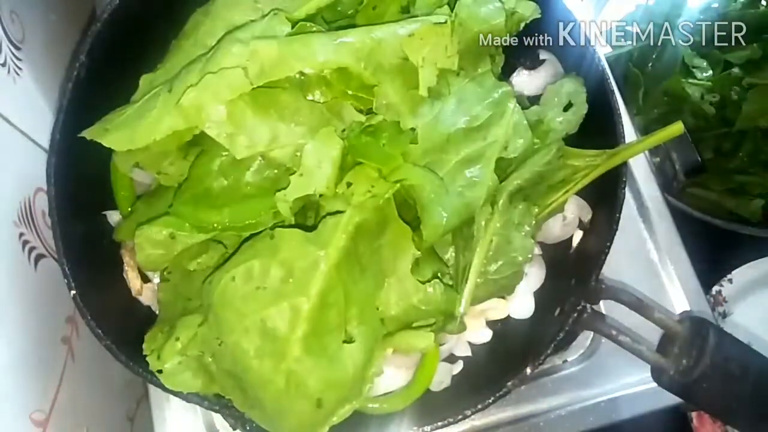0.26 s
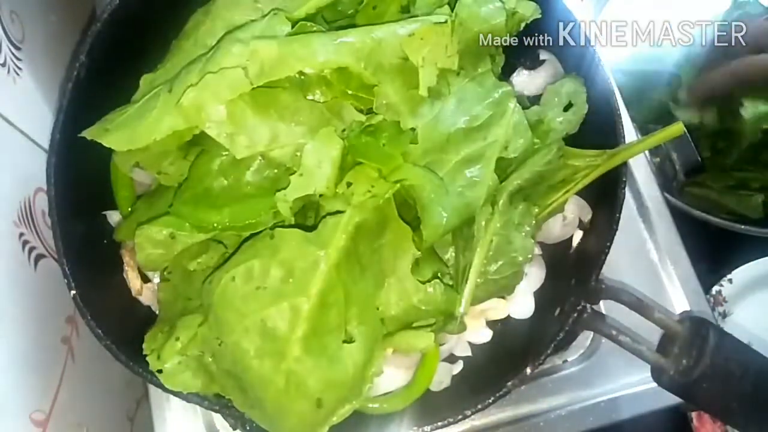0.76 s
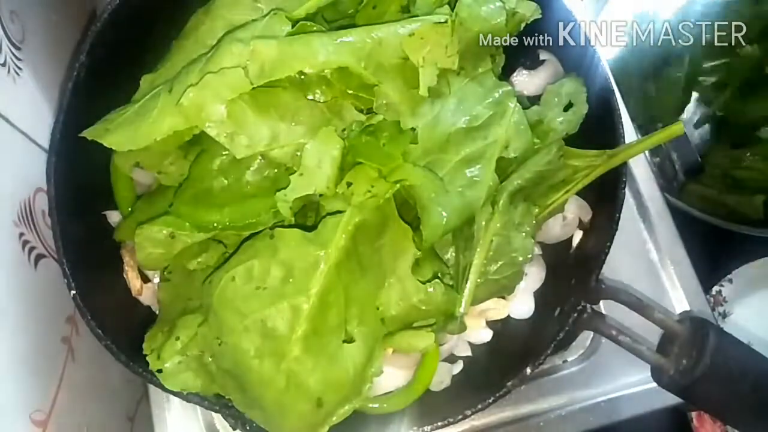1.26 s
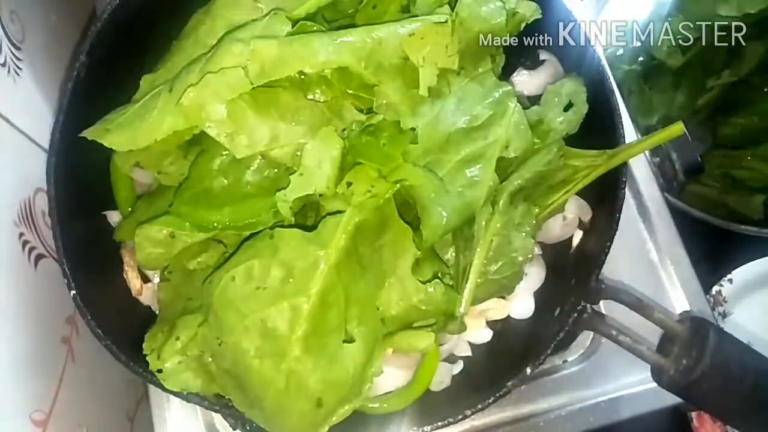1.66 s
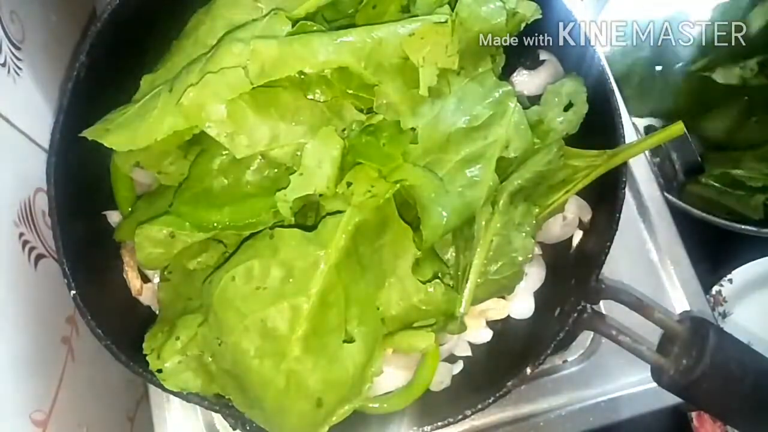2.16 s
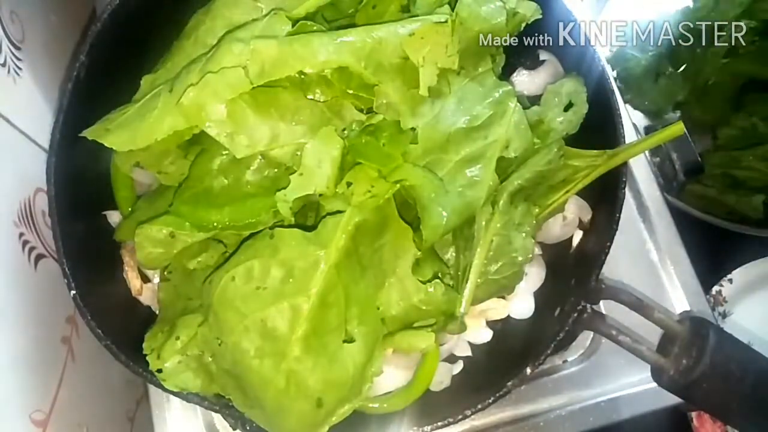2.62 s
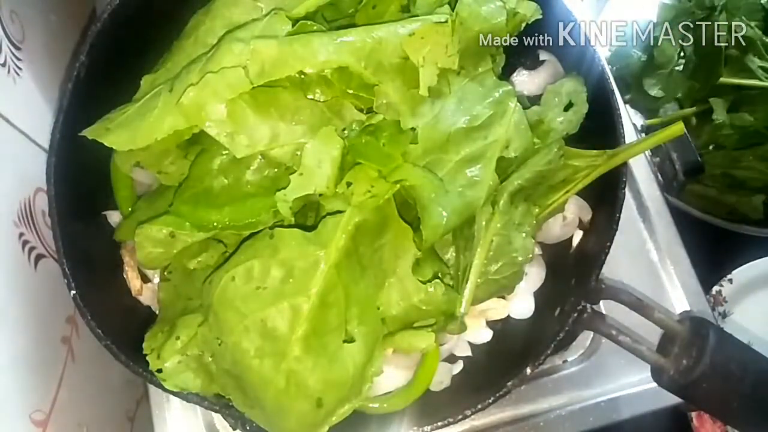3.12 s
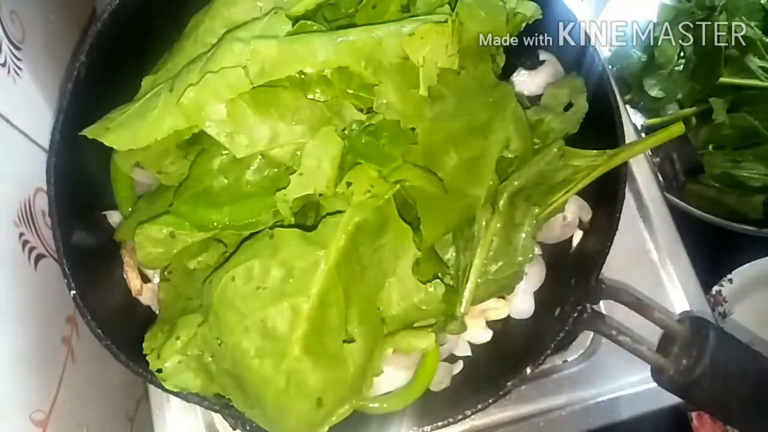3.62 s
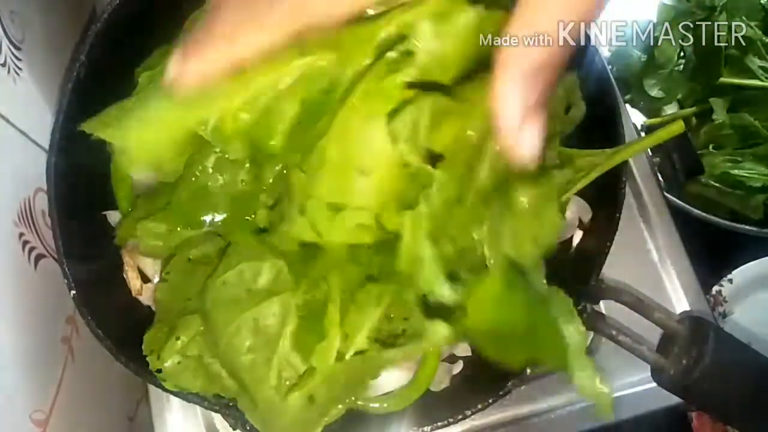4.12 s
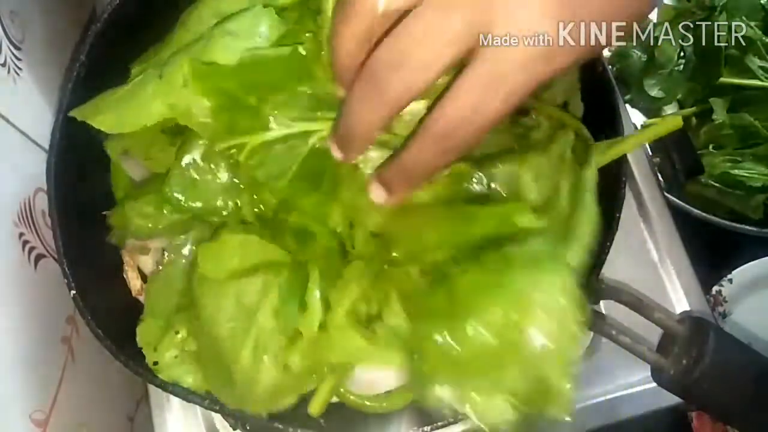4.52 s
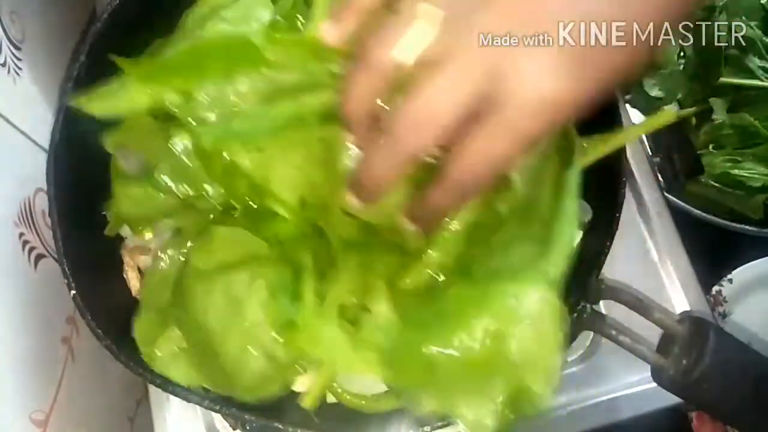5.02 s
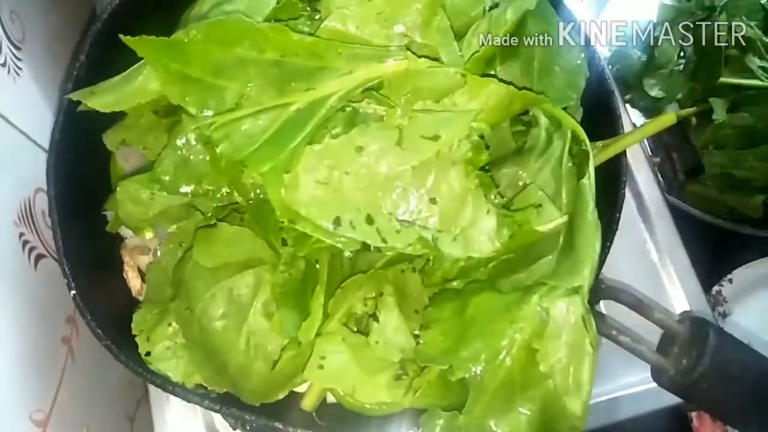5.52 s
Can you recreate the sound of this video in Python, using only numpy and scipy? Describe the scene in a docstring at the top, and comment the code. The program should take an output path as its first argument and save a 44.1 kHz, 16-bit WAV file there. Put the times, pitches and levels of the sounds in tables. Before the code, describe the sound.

Close phone recording in a small kitchen: wet leaves fry in a pan with steady fine fizz, loose crackle and ringing pops. Bright spitting flares in the first second, then thins. Dull bumps follow midway, a bunch of wet leaves slaps down just after four seconds, and pops crowd back near the end over a throbbing low hum.

```python
"""Wet leaves fry in oil in a pan close to a phone microphone, in a small kitchen where a fan motor hums and throbs.
Steam bubbles burst throughout: a dense fizz, a looser crackle, and single pops that ring the pan, with oil spatter.
The finest spitting flares from 0.4 to 1 s; bumps come at 2.5 s and, strongest, at 3.3 s; at 4.1 s wet leaves
slap down, and pops crowd in again after 5 s. Bursts are filtered clicks and noise; the phone thins weak sound."""
import sys
import numpy as np
from scipy import signal
from scipy.fft import rfft, irfft
from scipy.io import wavfile
from scipy.ndimage import uniform_filter1d

SR = 44100
rng = np.random.default_rng(int(sys.argv[2]) if len(sys.argv) > 2 else 0)


def int16_out(signal):
    """Quantize to a 16-bit WAV file."""
    q = np.round(np.clip(np.atleast_2d(signal).T, -1, 1) * 32767)
    wavfile.write(sys.argv[1], SR, q.astype(np.int16))


N = 254765

# ringing modes of the pan: (pitch [Hz], width [Hz], relative level [dB])
PAN = [(570, 71, 0), (792, 26, -6.5), (929, 69, 3.5), (1130, 67, 3), (1279, 68, 3.5), (1674, 115, 2.5),
       (1838, 92, -5.5), (1945, 60, 0), (2251, 71, 2), (2400, 49, -9), (2747, 55, 0), (3036, 107, 0)]
TOP_HZ = 15800  # upper limit of the phone and of the treble in the room tail


def undb(db):
    """Gain of a level in dB."""
    return 10 ** (np.asarray(db) / 20)


def level(x, db):
    """Scale to an rms level in dB."""
    return x * undb(db) / np.sqrt(np.mean(x ** 2))


def band(x, lo_hz, hi_hz, order=2):
    """Causal band-pass."""
    return signal.sosfilt(signal.butter(order, [lo_hz, hi_hz], "bandpass", fs=SR, output="sos"), x)


def mode(x, hz, width_hz, order=1):
    """One resonance: a band-pass centred on its pitch."""
    return band(x, hz - width_hz / 2, hz + width_hz / 2, order)


def walk(rate):
    """Random levels held 1 / rate s and smoothed twice; their spread is about 0.7."""
    k = int(SR / rate)
    held = np.repeat(rng.standard_normal(N // k + 1), k)
    return uniform_filter1d(uniform_filter1d(held, k), k)[:N]


def bursts(per_s, spread_db, most=4.47):
    """Clicks of either sign at random moments; most are small, a few are large."""
    hit, size, sign = rng.random((3, N))
    size_db = spread_db * np.minimum(-np.log(size + 1e-9), most)
    return (hit < per_s / SR) * undb(size_db) * np.sign(sign - .5)


def curves(table):
    """Gains over time from the dB columns of a table."""
    s, *columns = np.transpose(table)
    return [undb(np.interp(np.arange(N) / SR, s, c)) for c in columns]


def along(table, f):
    """Read a (frequency [Hz], level [dB]) table on a log-frequency axis."""
    hz, db = np.transpose(table)
    return np.interp(np.log(np.maximum(f, 1)), np.log(hz), db)


def frying():
    """Tiny bubbles fizz near 4.5 kHz, larger ones crackle in the pan, the finest spit in the top octave."""
    # rms level of the fizz; its lower edge, 3.5 to 3.9 kHz, is set as the phone lets it through:
    # (time [s], main band [dB], lower edge [dB])
    fizz_levels = [(0, -49.5, -56.5), (.4, -51, -56), (.72, -49.5, -50.5), (1.21, -50, -57),
                   (2.14, -50, -54.5), (3.06, -52, -53), (3.39, -51, -64), (3.68, -51, -57.5),
                   (4.15, -51.5, -63), (4.38, -53.5, -87), (4.65, -52, -62), (4.79, -51, -57.5),
                   (5.39, -51, -56.5), (5.78, -50.5, -56)]
    # how lively the leaves crackle: (time [s], bright ticks [dB], dull ticks [dB])
    crackle_levels = [(0, -58.5, -66), (.32, -59, -66.5), (.53, -54, -59), (.66, -59, -64), (.98, -56, -65),
                      (1.2, -60, -67.5), (1.7, -63, -70.5), (2.01, -63, -77), (2.23, -61, -60),
                      (2.57, -60.5, -66.5), (2.81, -63, -64.5), (2.95, -56.5, -57.5), (3.15, -66, -72),
                      (3.4, -61.5, -66), (3.81, -67.5, -67), (4.38, -70, -70.5), (4.76, -60, -61.5),
                      (4.99, -64, -62.5), (5.37, -59, -69), (5.47, -74, -60), (5.62, -55.5, -63),
                      (5.78, -55, -69)]
    main, edge = curves(fizz_levels)
    bright, dull = curves(crackle_levels)

    fizz = band(bursts(3200, 3.5, most=6.4), 3830, 5280, order=5)
    fizz = fizz + .6 * band(fizz, 4160, 4630, order=1)
    fizz = level(fizz, 0) * undb(1.27 * walk(9))
    lower_edge = level(band(bursts(1200, 4.9), 3500, 3860, order=3), 0)

    # the finest spitting idles, and flares while water runs into the oil
    start_s, rise_s, hold_s, fall_s = .416, .066, .41, .12
    corners_s = np.cumsum([start_s, rise_s, hold_s, fall_s])
    flare = np.interp(np.arange(N) / SR, corners_s, [0, 1, 1, 0])
    idle_db, flare_db = -80.5, 10.5
    spit = level(band(bursts(900, 5.7), 12300, 12800), idle_db)
    spit = spit * undb(flare_db * flare + 3.8 * walk(8))

    dull_ticks = crackle(PAN[1:5], wider=2.6) * dull
    bright_ticks = crackle(PAN[5:]) * bright
    return fizz * main + lower_edge * edge + dull_ticks + bright_ticks + spit


def crackle(modes, wider=2.8):
    """Soft grains of larger bubbles wake the rings of the pan, each ring in short patches of its own."""
    shared, out = bursts(150, 4.0), np.zeros(N)
    for hz, width_hz, db in modes:
        patches = undb(4.5 * walk(22))
        grains = .6 * shared + bursts(160, 4.2)
        out += level(mode(grains, hz, wider * width_hz, order=2), db) * patches
    return level(out, 0)


def pops():
    """Each pop is a very short rough burst that rings on its own pitch, a thud below it and a tick above."""
    # the louder pops, peak levels of each part's main burst:
    # (time [s], bubble pitch [Hz], bubble [dB], thud in the pan [dB], sharp tick [dB])
    pop_rows = [(.0197, 2870, -42, -62, -33), (.0814, 3190, -54, -60, -36), (.0879, 3190, -49, -63, -33),
                (0.1121, 2070, -35.5, -71.5, -51), (0.1377, 2440, -43, -66.5, -31),
                (.1652, 1954, -55, -63, -37), (.1927, 1940, -60, -66, -36), (0.202, 2260, -28, -40, -27),
                (0.251, 2140, -22.5, -25.5, -45.5), (.2697, 2000, -38, -51, -29),
                (0.3187, 2300, -35.5, -34, -23.5), (.3535, 3030, -50, -58.5, -26.5),
                (.4094, 2480, -60, -66.5, -31), (0.4732, 2090, -26, -47, -30), (.4911, 2800, -32, -40, -44),
                (.524, 2310, -32.5, -71, -32), (.5402, 1940, -38, -39, -29),
                (0.5485, 2700, -34, -59.5, -29), (.5531, 2900, -33.5, -42, -25.5),
                (.5653, 1900, -38, -59, -39), (.587, 2580, -21, -41, -28.5), (.6074, 2470, -32, -58, -30),
                (.6347, 2340, -31, -61, -43), (.6547, 2750, -46, -69.5, -26), (.6624, 3100, -47, -60, -29),
                (0.6793, 2450, -26.5, -68.5, -31), (.6918, 2460, -28, -51, -46),
                (.6975, 1920, -41, -58, -28), (.7172, 2390, -42, -54, -46), (0.741, 2630, -28, -46, -19),
                (.7884, 3070, -34, -74, -22), (0.8137, 2590, -29, -69.5, -34), (.8384, 2930, -35, -56, -39),
                (.8469, 2820, -35.5, -64, -29), (.8755, 2350, -31, -76, -34), (.9481, 2350, -42, -62, -36),
                (.985, 2400, -37.5, -62, -43), (1.019, 2230, -34.5, -66, -32),
                (1.049, 1980, -41, -42, -28.5), (1.067, 2580, -33, -74, -32),
                (1.1636, 2330, -56.5, -59, -27), (1.346, 1890, -54, -62, -41),
                (1.3628, 3320, -59, -50, -31), (1.4184, 2240, -30.5, -52, -21.5),
                (1.6036, 1680, -51, -67, -36), (1.6479, 3200, -57, -68, -35),
                (1.6766, 2980, -47, -70, -30.5), (1.7003, 2230, -37, -66, -27.5),
                (1.7557, 1700, -49, -64, -33.5), (1.8024, 2240, -45.5, -65.5, -26.5),
                (1.9208, 2380, -37, -48, -26), (1.9302, 2170, -33.5, -47.5, -24.5),
                (2.0533, 2250, -24, -30, -21.5), (2.0917, 2300, -30, -40.5, -24.5),
                (2.1917, 2140, -38, -72.5, -33.5), (2.2369, 1870, -49, -58, -32.5),
                (2.3041, 1700, -65, -66, -44), (2.3257, 3200, -56, -63, -30), (2.3562, 3180, -57, -54, -40),
                (2.4927, 2380, -21, -33, -23), (2.5262, 3080, -23, -40, -21.5),
                (2.5474, 2320, -28.5, -53.5, -26), (2.5698, 3170, -40, -50, -31),
                (2.6594, 1790, -40.5, -65.5, -32.5), (2.6953, 2130, -42, -70.5, -30.5),
                (2.7049, 3180, -48, -68, -41), (2.7929, 2480, -27.5, -45, -31),
                (2.849, 1870, -32, -62, -31), (2.8574, 1890, -38, -50, -31.5),
                (2.9348, 2250, -23.5, -45, -45), (2.95, 1930, -31.5, -42.5, -26),
                (3.031, 2150, -39, -42, -28), (3.1052, 2410, -41, -71, -28),
                (3.127, 2760, -28.5, -45, -25.5), (3.1896, 2340, -29, -61, -28.5),
                (3.3256, 2150, -24.5, -36, -28), (3.407, 1720, -36, -41, -28.5),
                (3.4546, 3030, -36, -61, -31), (3.5012, 2860, -56, -51, -32.5),
                (3.526, 2450, -37, -46, -31), (3.5361, 2260, -45, -55, -32.5),
                (3.5813, 2250, -61, -50, -24), (3.6102, 1920, -21.5, -33.5, -28),
                (3.6521, 1910, -33, -51, -31.5), (3.6676, 2000, -38.5, -45, -30),
                (3.7099, 2880, -47, -46, -24), (3.7198, 3200, -48, -53, -36), (3.8153, 3200, -49, -66, -33),
                (3.8385, 2430, -61, -65, -38.5), (3.9382, 2070, -58, -67, -31.5),
                (4.0755, 2720, -30.5, -37, -53.5), (4.0835, 1850, -39, -31, -53),
                (4.1221, 1570, -58, -44, -46), (4.1414, 1700, -41.5, -42, -32),
                (4.375, 3320, -59, -44, -30.5), (4.5623, 1940, -41.5, -54, -36),
                (4.5868, 1770, -40, -47, -32.5), (4.7518, 1670, -48, -62, -43),
                (4.8467, 1710, -54, -44, -44), (4.8716, 2160, -31, -35.5, -34),
                (4.9472, 2140, -36, -44.5, -49), (5.0188, 2950, -45, -58, -50),
                (5.0244, 2700, -37, -65, -41), (5.0332, 2990, -48, -56, -42), (5.0433, 2800, -50, -64, -39),
                (5.055, 2430, -29, -42.5, -30), (5.1076, 1710, -45.5, -60, -44),
                (5.132, 2830, -49, -62, -48), (5.151, 2700, -32, -61, -36), (5.1695, 2050, -42, -60, -40),
                (5.1756, 2310, -50, -71.5, -32), (5.204, 1940, -55, -64, -48),
                (5.301, 2400, -40, -44.5, -28.5), (5.3215, 2300, -36, -50, -36),
                (5.3681, 1650, -53, -45, -36), (5.3839, 2780, -32.5, -65, -31),
                (5.4054, 2350, -24.5, -35, -29), (5.4629, 2200, -36.5, -61, -51),
                (5.4974, 2420, -15, -26, -24.5), (5.5482, 2450, -19.5, -36.5, -30),
                (5.5674, 2000, -36.5, -44, -31), (5.6926, 2270, -30.5, -69, -44),
                (5.7374, 2300, -34, -68, -36), (5.7622, 2320, -30, -42, -46)]
    rows = cluster(pop_rows, 2, drop_db=15.5)
    rough = rng.standard_normal((len(rows), 512))
    bubble_band = (1600, 3205, .00037)  # low Hz, high Hz, burst s
    bubble = bang(rows, 2, *bubble_band, rough, pitch_width=.39)
    # a narrower ring on the bubble's own pitch
    ring = undb(-9.5) * bang(rows, 2, *bubble_band, rough, pitch_width=.12)
    thud = bang(rows, 3, 712, 1470, .001, rough)
    tick = bang(rows, 4, 3420, 5080, .00089, rough)
    return bubble + ring + thud + tick


def spatter():
    """Each droplet of oil thrown up is a bright splash with a finer spray on top."""
    # peak levels: (time [s], splash [dB], finest spray [dB])
    droplets = [(.2018, -38.5, -45), (.4733, -44.5, -52.5), (.5223, -54, -46), (.542, -44, -43.5),
                (0.5484, -37, -29), (.5535, -37, -41), (.587, -31, -31), (.5915, -38, -42),
                (.6074, -37, -47), (.6356, -42, -41), (.6547, -37, -32), (.679, -51, -44),
                (0.6917, -38, -41), (.7175, -42, -36), (.7412, -44, -26), (.7508, -37, -37),
                (.7755, -45, -40), (.7884, -42, -47), (.7993, -56, -44), (.8139, -33.5, -32),
                (.8322, -42, -49), (.8755, -40.5, -55.5), (.8873, -66, -37.5), (.976, -44, -44),
                (1.049, -42, -40), (1.102, -42, -45), (1.1427, -56, -38.5), (1.8024, -53.5, -36),
                (1.9304, -44, -45.5), (2.0533, -45, -52), (2.092, -40.5, -57), (2.493, -34, -40),
                (2.5265, -34, -40), (2.7929, -36, -38), (2.849, -58.5, -39.5), (3.1896, -38, -46),
                (3.526, -35, -41), (3.6103, -41, -60.5), (4.1415, -45, -44.5), (5.025, -38, -46),
                (5.055, -39, -57), (5.151, -39, -49), (5.4052, -38, -48), (5.4978, -31.5, -45),
                (5.5486, -32.5, -59.5), (5.5894, -39, -66.5), (5.68, -66, -46), (5.6926, -40.5, -47),
                (5.7622, -39.5, -42)]
    rows = cluster(droplets, 1, drop_db=10)
    rough = rng.standard_normal((len(rows), 512))
    return bang(rows, 1, 4700, 11440, .002, rough) + bang(rows, 2, 11980, 14500, .0011, rough)


def cluster(table, first_db_column, drop_db, count=2):
    """A burst sets off smaller ones close behind it: each row gains weaker repeats at uneven gaps."""
    gap_s, scatter_db = .018, 5.5
    rows = np.array(table)
    gaps = rng.uniform(.4, 1.6, (len(rows), count))
    sizes = rng.standard_normal((len(rows), count))
    after = np.repeat(rows, count, axis=0)
    delay_s = gap_s * np.cumsum(gaps, axis=1).ravel()
    after[:, 0] = np.minimum(after[:, 0] + delay_s, (N - 1) / SR)
    change_db = scatter_db * np.minimum(sizes, 1) - drop_db * np.arange(1, count + 1)
    after[:, first_db_column:] += change_db.reshape(-1, 1)
    return np.vstack([rows, after])


def bang(rows, column, lo_hz, hi_hz, burst_s, rough, pitch_width=None):
    """Very short decaying noise in one band, at the times and peak levels of a table."""
    shape = band(rough * np.exp(-np.arange(512) / SR / burst_s), lo_hz, hi_hz, order=4)
    if pitch_width:  # ring each burst on its own pitch; width as a share of the pitch
        shape = np.array([mode(v, hz, hz * pitch_width) for v, hz in zip(shape, rows[:, 1])])
    gain = undb(rows[:, column]) / np.abs(shape).max(axis=1)
    places = (rows[:, :1] * SR).astype(int) + np.arange(512)
    out = np.zeros(N + 512)
    np.add.at(out, places, shape * gain[:, None])
    return out[:N]


def hollows():
    """The larger pops ring a hollow under the leaves: short low tones that die away."""
    # (time [s], starting level [dB], pitch [Hz])
    hollow_rows = [(0.2015, -37, 760), (0.251, -30, 820), (0.472, -38, 1260), (0.553, -37.5, 950),
                   (2.053, -32, 1317), (2.491, -40.5, 540), (2.792, -42, 1130), (2.933, -33.5, 1270),
                   (3.029, -39, 1254), (3.125, -43, 921), (3.324, -41, 1280), (3.61, -30, 1270),
                   (4.871, -40, 1254), (5.404, -37, 1130), (5.497, -33, 918), (5.761, -35.5, 797)]
    t60_s = .039
    out, t = np.zeros(N + 4096), np.arange(4096) / SR
    for s, db, hz in hollow_rows:
        start = int(s * SR)
        out[start:start + 4096] += undb(db - 60 * t / t60_s) * np.sin(2 * np.pi * hz * t)
    return out[:N]


def blips(width=0.06, grain_db=3.0):
    """Narrow blips: short bands of uneven noise, such as the phone's suppressor lets through."""
    # rows near 445 Hz are moments when the fan's overtone comes through:
    # (time [s], length [s], pitch [Hz], rms level before fading [dB])
    blip_rows = [(0.099, 0.057, 1800, -55), (0.939, 0.085, 2360, -49.5), (1.037, 0.051, 1930, -46),
                 (1.038, 0.13, 1140, -59.5), (1.245, 0.051, 453, -58), (1.292, 0.11, 1860, -57.5),
                 (1.328, 0.089, 1130, -55), (1.621, 0.19, 1674, -55.5), (1.789, 0.046, 2230, -50),
                 (2.198, 0.084, 1770, -52), (2.406, 0.091, 443, -54), (3.255, 0.15, 443, -54),
                 (3.104, 0.11, 1940, -53), (3.622, 0.14, 1187, -47.5), (4.557, 0.057, 1830, -48),
                 (4.6, 0.16, 950, -57.5), (4.729, 0.096, 1650, -53.5), (4.785, 0.046, 1100, -51.5),
                 (5.069, 0.16, 2850, -54), (5.298, 0.052, 2200, -51)]
    out, t = np.zeros(N), np.arange(8192) / SR
    for s, length_s, hz, db in blip_rows:
        grain = undb(grain_db * rng.standard_normal(64)).repeat(128)
        blip = mode(rng.standard_normal(8192) * grain, hz, hz * width, order=2)
        fade = np.clip(t / 0.007, 0, 1) * np.exp(-(t / length_s) ** 3)
        start = int(s * SR)
        out[start:start + 8192] += level(blip, db) * fade
    return out


def slap(per_s=600):
    """A wet bunch of leaves slaps down: a dying shower of small contacts rings it, higher rings fading faster."""
    # what it rings with: (pitch [Hz], width [Hz], relative level [dB])
    leaf_rings = [(454, 44, -5), (766, 120, 0), (983, 70, -2), (1337, 58, -2), (1850, 76, -5),
                  (2580, 120, -1), (2970, 90, -12), (3280, 100, -14)]
    start_s, rise_s, t60_s, slap_db = 4.074, .003, .3, -38
    loss_db_s_khz = 35  # extra fading, dB per second for each kHz
    t = np.maximum(np.arange(N) / SR - start_s, 0)
    swell = (1 - np.exp(-t / rise_s)) * undb(-60 * t / t60_s)
    shower, out = bursts(per_s, 3.5), np.zeros(N)
    for hz, width_hz, db in leaf_rings:
        ring = level(mode(shower, hz, width_hz, order=2), slap_db + db)
        out += ring * undb(-loss_db_s_khz * hz / 1000 * t)
    return swell * out


def pan(x, ring_db):
    """The direct sound plus the ringing of the pan, less the pitches that the pan swallows."""
    # (pitch [Hz], width [Hz], level left at the centre [dB])
    swallowed = [(1460, 200, -2), (2570, 270, -5.5), (3455, 107, -0.5)]
    ring = sum(undb(db) * mode(x, hz, width_hz) for hz, width_hz, db in PAN)
    x = x + ring * undb(ring_db)
    for hz, width_hz, db in swallowed:
        x = x - (1 - undb(db)) * mode(x, hz, width_hz)
    return x


def kitchen(x, count=4):
    """Direct sound, then a dense tail that steps up at the nearest wall's echo; each pan spot has its own tail."""
    t60_s, tail_db, wall_s = .24, -3, .0088
    early_db, early_t60_s, lump_db = -1, .04, 3.5  # first echoes, and how lumpy the tail is
    treble_db, treble_loss_db_s = 2, 120  # lift of the top octave, and its extra fading per second
    t, hold = np.arange(SR // 3) / SR, int(.025 * SR)  # the bubbling stays 25 ms at a spot
    spot = np.repeat(rng.integers(count, size=N // hold + 1), hold)[:N]
    out = x.copy()
    for k in range(count):
        decay = undb(-60 * t / t60_s) + undb(early_db - 60 * t / early_t60_s)
        arrival = np.where(t < wall_s, .6, 1) * (t > .0015)
        lumps = undb(lump_db * rng.standard_normal(len(t) // 128 + 1)).repeat(128)[:len(t)]
        tail = rng.standard_normal(len(t)) * decay * arrival * lumps
        treble = undb(treble_db - treble_loss_db_s * t) * band(tail, 8900, TOP_HZ, order=1)
        tail = pan(tail, ring_db=-1.0) + treble
        tail = tail * undb(tail_db) / np.sqrt(np.sum(tail ** 2))
        share = uniform_filter1d(1. * (spot == k), size=64)
        out += signal.oaconvolve(x * share, tail)[:N]
    return out


def bumps():
    """Dull knocks through the worktop: noise that swells fast and dies away."""
    # (time [s], rise [s], t60 [s], low edge [Hz], high edge [Hz], rms level at the height of the swell [dB])
    knocks = [(2.49, 0.02, 0.32, 410, 950, -45.5), (3.33, 0.043, 0.52, 111, 174, -27.5),
              (3.335, 0.092, 0.46, 171, 520, -32), (3.335, 0.035, 0.36, 507, 1020, -40),
              (3.585, .012, .2, 88, 125, -34), (4.08, 0.0066, 0.37, 383, 1410, -38.5),
              (4.1, 0.01, 0.24, 200, 408, -50)]
    out = np.zeros(N)
    for s, rise_s, t60_s, lo_hz, hi_hz, db in knocks:
        t = np.maximum(np.arange(N) / SR - s, 0)
        swell = (1 - np.exp(-t / rise_s)) * undb(-60 * t / t60_s)
        noise = level(band(rng.standard_normal(N), lo_hz, hi_hz, order=3), db)
        out += swell / swell.max() * noise
    return out


def fan():
    """Twice the mains frequency, with side tones at the rotor slip that make it throb, and two rough overtones."""
    # hum and its side tones: (offset [steps of slip_hz], rms level [dB], lag [turns])
    tones = [(-1, -43, 0.041), (0, -44, 0.16), (1, -40, 0.0044), (2, -60, 0.026)]
    # rough overtones: (pitch [Hz], width [Hz], rms level [dB])
    overtones = [(200, 6, -60), (444, 7, -68)]
    hum_hz, slip_hz = 100.135, 2.775
    throb_s = .04  # first moment at which the side tones meet
    t = np.arange(N) / SR
    turns = hum_hz * t + 0.015 * walk(4.03)
    hum = np.zeros(N)
    for k, db, lag in tones:
        phase = turns + k * slip_hz * (t - throb_s) - lag
        hum += undb(db) * np.sqrt(2) * np.cos(2 * np.pi * phase)
    rough = sum(level(mode(rng.standard_normal(N), hz, width_hz), db) for hz, width_hz, db in overtones)
    return hum * undb(0.69 * walk(4.15)) + rough


def air(table, db):
    """Steady noise of a given colour: a random spectrum weighted by a table."""
    colour = undb(along(table, np.fft.rfftfreq(N, 1 / SR)))
    return level(irfft(rfft(rng.standard_normal(N)) * colour, N), db)


def scene():
    """Pops, spatter, frying and hollows sound through the kitchen; blips and slap stay dry; the rest lies below."""
    # colour of the rumble: (frequency [Hz], relative level per Hz [dB])
    rumble_colour = [(15, -40.5), (30, -14), (50, 3.5), (80, -4), (120, 1), (170, -10.5), (230, -23.5),
                     (450, -32), (800, -36.5)]
    in_pan = pan(pops() + spatter() + frying(), ring_db=-1.35)
    near = kitchen(in_pan + hollows()) + blips() + slap()
    # bumps, fan and rumble come through the worktop
    worktop = pan(bumps(), ring_db=-14.0) + fan() + air(rumble_colour, -48)
    return (near + worktop)[None]


def suppress(x, steep=1.57, hold=0.92, share=0.2, memory=.99):
    """Noise suppressor: narrow bands under a threshold are shut, so tails break up into blips."""
    # (frequency [Hz], base threshold per bin [dB])
    thresholds = [(300, -100), (450, -73), (800, -69), (2000, -68.5), (3300, -67), (4500, -64), (5600, -85),
                  (9000, -72.5), (15000, -82.5)]
    f, _, z = signal.stft(x, SR, nperseg=512, noverlap=384)
    power = uniform_filter1d(np.abs(z) ** 2, size=2, axis=0)
    power = uniform_filter1d(power, size=9, axis=1)
    # above 600 Hz the threshold of a band rises with what it has carried lately
    lately = signal.lfilter([1 - memory], [1, -memory], power) * (f[:, None] > 600)
    threshold = undb(2 * along(thresholds, f))[:, None] + share * lately
    ratio = (np.maximum(power, 0) / threshold) ** steep
    gain = ratio / (1 + ratio)
    # bands open at once and close slowly
    gain = np.maximum(gain, signal.lfilter([1 - hold], [1, -hold], gain))
    return signal.istft(z * gain, SR, nperseg=512, noverlap=384)[1][:N]


def record(dry):
    """The phone suppresses weak sound, adds its own hiss and cuts the top."""
    # colour of the hiss: (frequency [Hz], relative level per Hz [dB])
    hiss_colour = [(300, -5.5), (700, 1), (2000, 0), (3300, -0.5), (5800, -13.5), (12000, -10.5),
                   (16000, -11.5)]
    heard = suppress(dry[0]) + air(hiss_colour, -63.5)
    return signal.sosfilt(signal.ellip(10, .2, 70, TOP_HZ, fs=SR, output="sos"), heard)[None]


dry = scene()
out = record(dry)
int16_out(out)
```